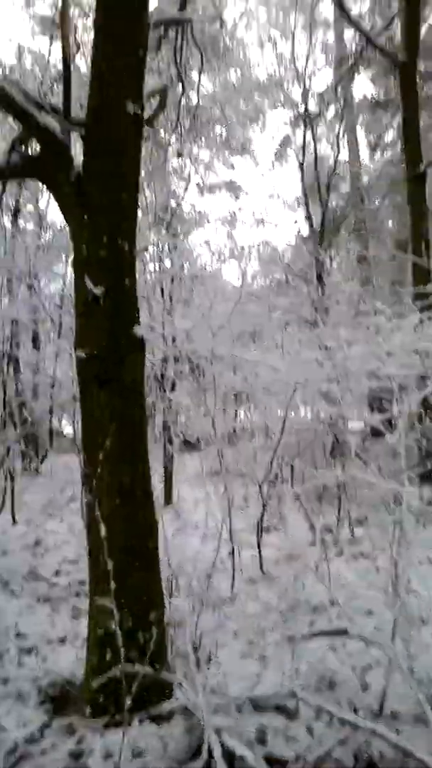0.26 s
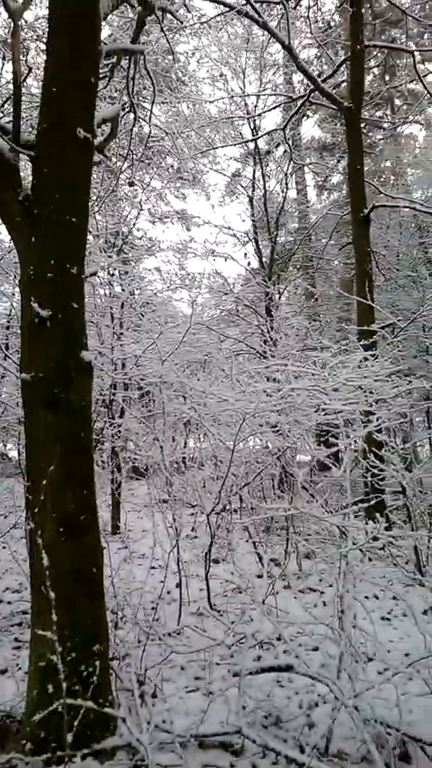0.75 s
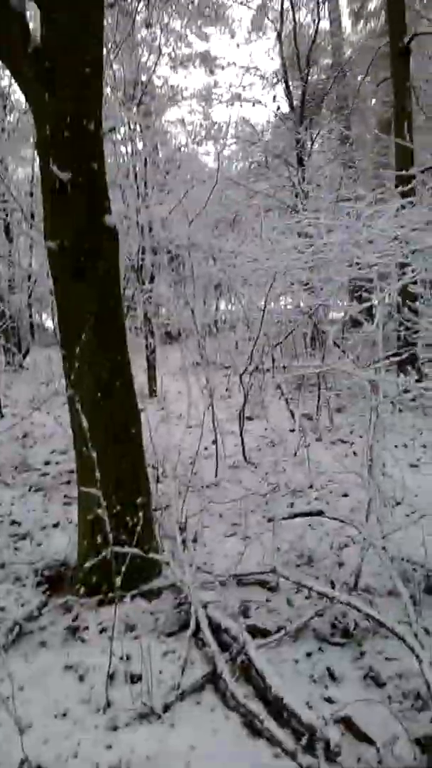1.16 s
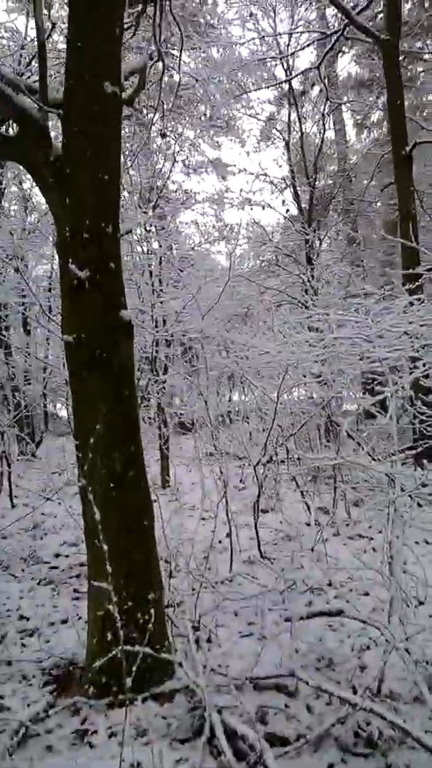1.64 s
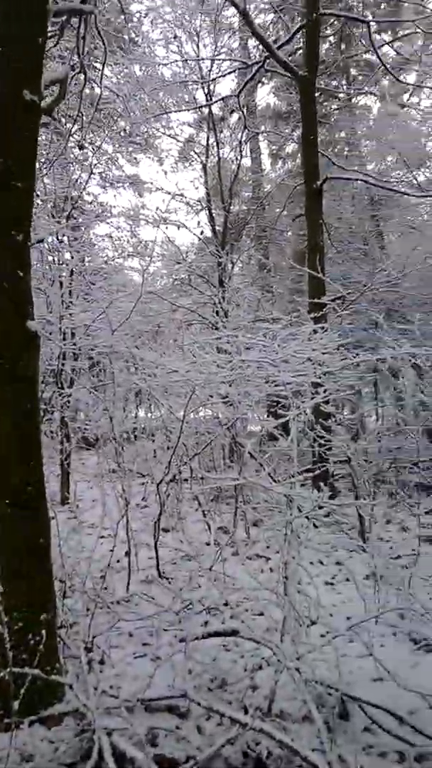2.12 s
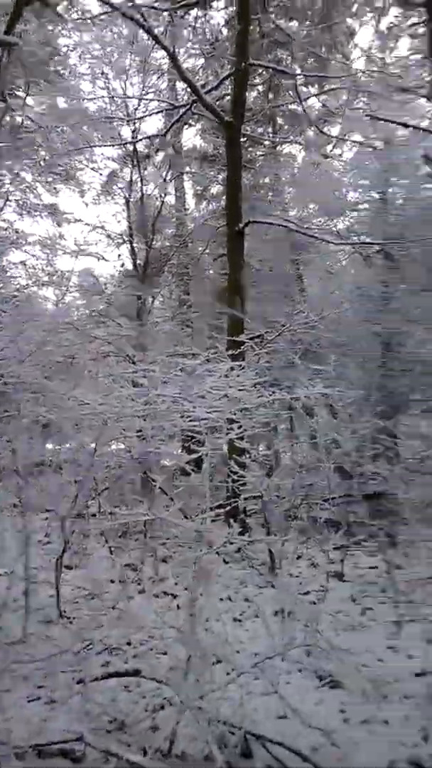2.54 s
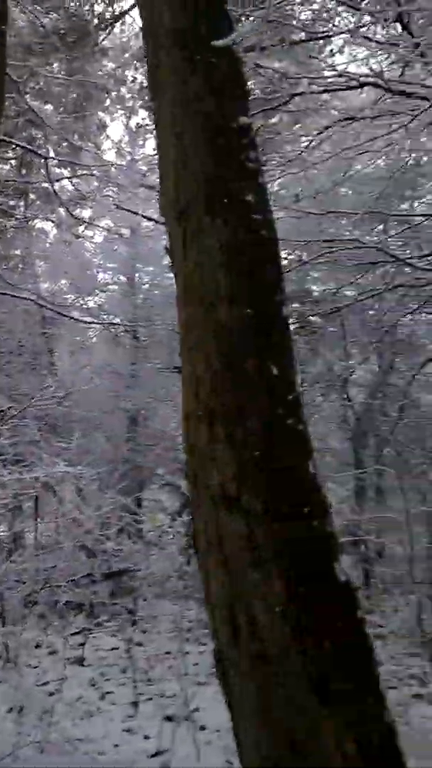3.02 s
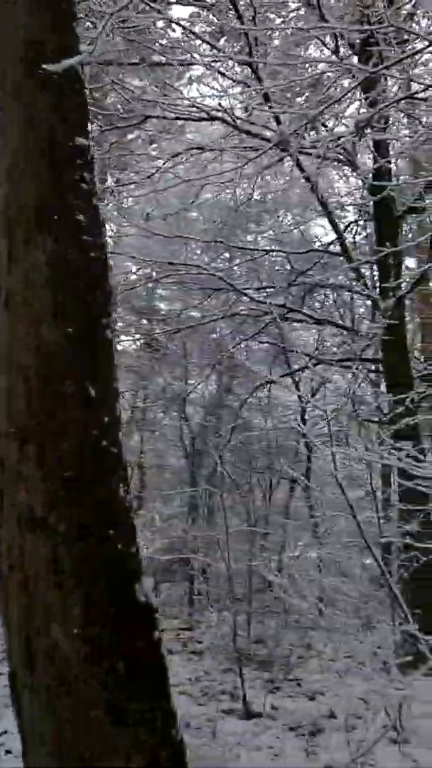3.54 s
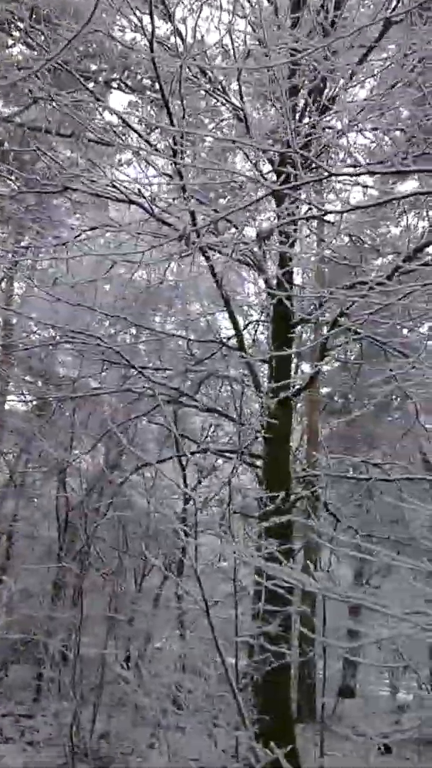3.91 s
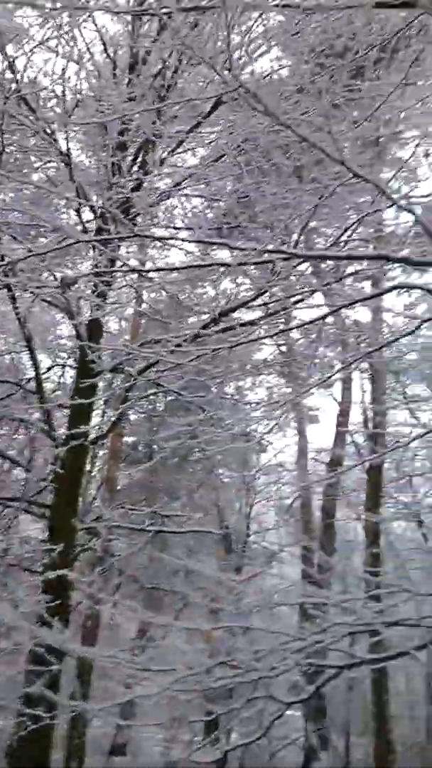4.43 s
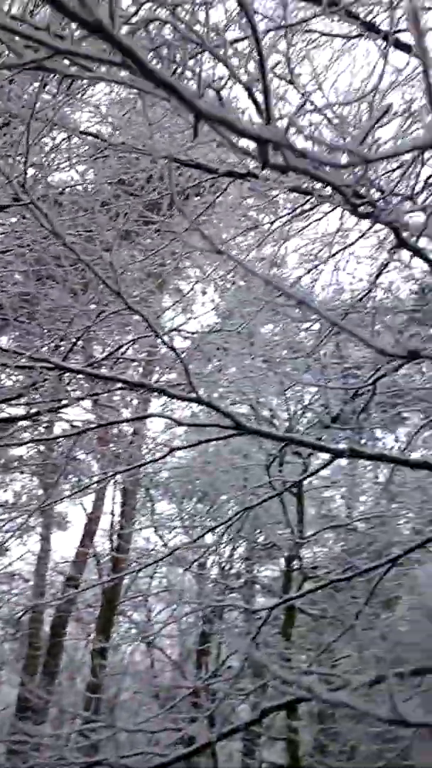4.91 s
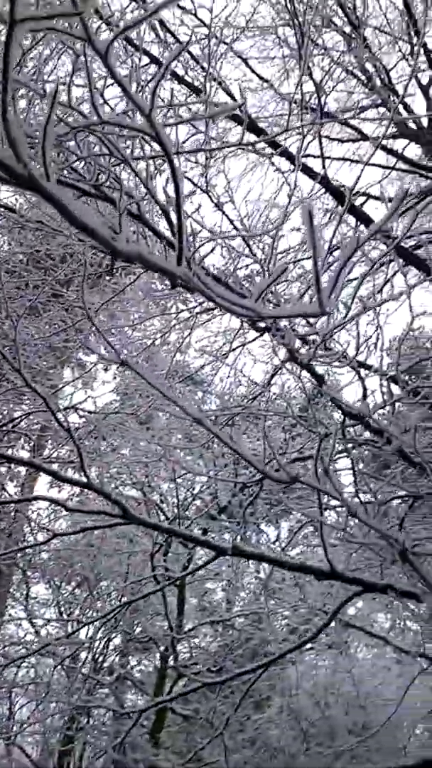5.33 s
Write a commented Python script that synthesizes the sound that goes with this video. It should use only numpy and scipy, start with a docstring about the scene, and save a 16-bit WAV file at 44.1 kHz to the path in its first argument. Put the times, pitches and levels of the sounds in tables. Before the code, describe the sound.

Slow footsteps crunch through crusted snow, sharp icy snaps and gritty squeezes over soft low thumps, in an almost silent forest.

```python
"""First a faint forest hush fades in, and almost at once the crust of the snow begins to snap.
Someone walks through snow in a still forest, heard from a small hand-held microphone.
Snaps are short noise bursts; packed snow crunches and hisses as gritty, filtered noise;
thumps and creaks are low swings that die quickly. Lumpy rustles and the hush are shaped noise."""
import sys
import numpy as np
from scipy.fft import rfft, irfft, next_fast_len
from scipy.io import wavfile
from scipy.ndimage import map_coordinates

SR = 44100
rng = np.random.default_rng(int(sys.argv[2]) if len(sys.argv) > 2 else 0)


def int16_out(signal):
    """Quantize to a 16-bit WAV file."""
    q = np.round(np.clip(np.atleast_2d(signal).T, -1, 1) * 32767)
    wavfile.write(sys.argv[1], SR, q.astype(np.int16))


N = 245637  # length in samples


# Loud snaps of the crust: t/s, level/dB (peak before MIC_EDGE), f/Hz (centre),
# level/dB of the woody knock relative to the snap
CRUST_SNAPS = [(0.0672, -31, 5100, -21), (0.217, -13.5, 4350, -19), (0.2436, -13.5, 4140, -46),
               (0.282, -25.5, 2050, -22.5), (0.373, -23, 4930, -21), (0.393, -23.5, 4500, -31),
               (0.425, -27, 4280, -37), (0.4582, -20, 4630, -35), (0.593, -21.5, 2780, -27),
               (0.6051, -13.5, 4650, -18.5), (0.615, -7.5, 6050, -10), (0.721, -28.5, 5760, -24),
               (0.7711, -20, 4550, -43), (0.7908, -23.5, 3670, -12.5), (0.825, -36, 6450, -38),
               (0.8447, -27, 3830, -35), (0.855, -13, 7540, -31), (0.8584, -13.5, 3700, -26),
               (0.8651, -21, 2840, -5), (0.912, -31, 5500, -30), (0.941, -16.5, 4100, -30),
               (0.961, -2.5, 4560, -20), (0.969, -13.5, 3370, -26), (0.9867, -15, 3040, -34),
               (1.1487, -25, 4460, -12), (1.1718, -22, 5100, -11.5), (1.2745, -35, 4400, -15),
               (1.403, -28.5, 3760, -12), (1.4312, -26.5, 3200, -14), (1.443, -16.5, 4400, -38),
               (1.4599, -10, 3670, -11.5), (1.4626, -25, 3510, -3), (1.4888, -25.5, 3680, -15),
               (1.5059, -3, 4800, -36), (1.5178, -4, 4430, -7), (1.558, -27.5, 5500, -12),
               (1.5905, -9, 3880, -11), (1.602, -1, 4300, -17), (1.6404, -1.5, 4200, -34),
               (1.6427, -5, 3700, -16), (1.6593, -23, 6230, -35), (1.8007, -22.5, 4260, -14.5),
               (1.8632, -16, 4970, -37), (1.8772, -22, 5000, -35), (1.902, -11.5, 3960, -16),
               (1.9455, -15.5, 6650, -22), (1.971, -16, 6330, -14), (2.0026, -15.5, 4080, -40),
               (2.0103, -11, 6700, -24), (2.067, -22, 3670, -35), (2.0853, -16, 5730, -25),
               (2.0904, -4.5, 5870, -50), (2.121, -11.5, 2520, -12.5), (2.137, -16, 5000, -22.5),
               (2.204, -26.5, 6940, -30), (2.2418, -14, 5370, -17), (2.328, -17, 4270, -34),
               (2.3412, -3.5, 2680, -28), (2.353, -9, 2580, -1.5), (2.3923, -18, 1900, -20),
               (2.4728, -21.5, 4100, -35), (2.5437, -22.5, 3300, -34), (2.5839, -21, 5200, -42),
               (2.6547, -25, 3350, -9), (2.659, -18.5, 3900, -36), (2.6847, -22, 3100, -23),
               (2.768, -22.5, 2950, -17), (2.7813, -20, 2590, -6), (2.7863, -18, 6640, -25),
               (2.7936, -15.5, 2560, -4.5), (2.8101, -10, 2500, 3.5), (2.811, -2, 3600, -47),
               (2.8148, -3, 4960, -33), (2.835, -1.5, 3060, -51), (2.859, -5, 6900, -24),
               (2.903, -18, 6650, -12), (2.9367, -33, 7000, -25), (3.041, -25.5, 5760, -13),
               (3.1006, -28.5, 3070, -2.5), (3.1073, -23.5, 5500, -23), (3.1127, -18.5, 4400, -22),
               (3.2064, -8.5, 4400, -26), (3.253, -27.5, 5400, -31), (3.2705, -23, 7110, -26),
               (3.3649, -18.5, 3400, -18), (3.5488, -13.5, 4090, -26), (3.5584, 0, 3330, -23),
               (3.5607, 2.5, 4630, -5.5), (3.6337, -30.5, 2920, -12), (3.681, -11.5, 3500, -6.5),
               (3.773, -20, 6000, -9), (3.7909, -5.5, 3300, -16), (3.8065, -11.5, 2830, -9),
               (3.821, -16.5, 3500, -28), (3.837, -11.5, 2840, -11), (3.8533, -7, 3400, -26),
               (3.91, -6.5, 3230, -48), (3.9124, -6, 3500, -49), (3.9261, -14, 3080, -19),
               (4.007, -23.5, 3930, -36), (4.0753, -26, 8550, -40), (4.1023, -13, 2250, -43),
               (4.1272, -5.5, 2190, -9), (4.136, -10, 4660, -21), (4.1425, -24, 9000, -40),
               (4.2944, -8, 4740, -30), (4.3096, -18, 3540, -23), (4.3223, -15, 5400, -46),
               (4.367, -9.5, 2830, -11.5), (4.4638, -19, 5570, -14), (4.466, -8, 3960, -32),
               (4.86, -16.5, 6180, -40), (4.8725, 2, 8100, -61), (4.8982, -24, 2800, -17),
               (4.9223, -9, 4600, -10), (4.9343, -25, 3500, -22), (4.9856, -12, 4960, -20),
               (5.063, -32, 6000, -19), (5.09, -20, 4060, -43), (5.1321, -25, 4260, -6),
               (5.2675, -9.5, 4600, -27), (5.378, -29, 5090, -34), (5.416, -9.5, 4750, -32)]


def snaps():
    """The loud breaks of the crust also knock the pack below."""
    s, db, hz, knock_db = np.transpose(CRUST_SNAPS)
    t = np.arange(300) / SR
    knock_hz = 850 * np.exp(0.46 * rng.standard_normal((len(s), 1)))
    knock = -np.sin(2 * np.pi * knock_hz * t) * np.exp(-t / 0.00027)
    knocks = placed(s, amp(db + knock_db)[:, None] * peaked(knock))
    return cracks(s, db, hz, width=0.61) + knocks


# The microphone's answer to a sharp break: f/Hz, level/dB
MIC_EDGE = [(500, 10), (4000, -4.5), (9000, -5), (12000, -14.5), (16500, -24), (19000, -57)]


def cracks(s, db, hz, width, order=1):
    """Each crack is a burst coloured around its own pitch, with faint spiky noise before and after."""
    t = (np.arange(1024) - 300) / SR  # the break itself is at t = 0
    after, before = np.clip(t, 0, 1), np.clip(-t, 0, 1)
    noise = rng.standard_normal((len(s), 2 * len(t)))
    spiky = noise[:, len(t):] ** 3
    burst = (t >= 0) * noise[:, :len(t)] * np.exp(-after / 0.0004)
    edge = burst - 2.2 * (t == 0)  # one sharp downward click starts the burst
    crumbs = amp(-38) * (t > 0) * spiky * np.exp(-after / 0.0038)
    lead_in = amp(-29) * (t < 0) * spiky * np.exp(-before / 0.0011)
    colour = hump(np.fft.rfftfreq(len(t), 1 / SR), hz[:, None], width=width) ** order
    crack = irfft(rfft(edge + crumbs + lead_in) * colour)
    return coloured(placed(s + t[0], amp(db)[:, None] * peaked(crack)), MIC_EDGE)


CLUMPING = 0.21  # how much the small breaks crowd into the squeezes
# smallest break over the boot's pressing level, and largest over smallest
CRACKLE_DB, CRACKLE_SPREAD_DB = 4, 13


def crackle():
    """Small random breaks between the loud ones, denser and stronger where the boot presses harder."""
    when, size, pitch = rng.random((1100, 3)).T
    crunch_db, fizz_db = pressure()[:2]
    press_db = np.maximum(crunch_db - 3.5, fizz_db)
    passed = np.cumsum(amp(CLUMPING * press_db))
    at = np.interp(when, passed / passed[-1], np.arange(N))  # in samples
    db = np.interp(at, np.arange(N), press_db) + CRACKLE_DB + CRACKLE_SPREAD_DB * size ** 3
    return cracks(at / SR, db, 1800 * 5.5 ** pitch, width=0.4, order=2)


# Stretches where brittle crust sheds many small bright grains: start t/s, end t/s,
# level/dB (smallest grain, before MIC_EDGE), f/Hz (middle pitch)
GRAIN_SHEDS = [(.24, .47, -52, 4500), (1.84, 2.11, -43, 5000), (2.27, 2.4, -45, 4000),
               (2.53, 2.76, -52, 4500), (2.86, 3.06, -43, 7000), (3.06, 3.3, -51, 6500),
               (3.78, 3.97, -41, 3800), (5.1, 5.2, -54, 4500)]
SHED_RATE, SHED_SPREAD_DB = 170, 17  # grains a second, largest over smallest


def shedding():
    """Brittle grains in uneven clumps, each a short tick near the pitch of its stretch."""
    out = np.zeros(N)
    for start, end, db, hz in GRAIN_SHEDS:
        gap, size, pitch = rng.random((round(SHED_RATE * (end - start)), 3)).T
        s = start + (end - start) * np.cumsum(gap ** 2) / np.sum(gap ** 2)
        grain_db = db + SHED_SPREAD_DB * size ** 2
        out += cracks(s, grain_db, hz * 2 ** (pitch - 0.5), width=0.55, order=2)
    return out


# Tone of the fine crystals: f/Hz, level/dB (only the shape counts)
CRYSTAL_TONE = [(1000, 10), (3500, 5.5), (6000, 8.5), (8500, 3), (11500, -5), (19000, -38)]
# Tone of the crumbling pack: f/Hz, level/dB (only the shape counts)
PACK_TONE = [(25, -4), (70, 8), (200, 0), (500, -9.5), (1000, -13.5), (2000, -50)]


def snow():
    """Grains break under the boot: a crunch of moving pitch, a fine fizz and a crumbling body."""
    crunch_db, fizz_db, body_db, hz = pressure()
    centres = np.geomspace(1000, 6200, 7)
    place = np.interp(np.log(hz), np.log(centres), np.arange(len(centres)))
    crunch = np.zeros(N)
    for k, centre in enumerate(centres):  # a moving resonance: neighbouring fixed ones cross-fade
        grains = gritty(300, share=0.8)
        band = unit(filtered(grains, lambda f: hump(f, centre, width=0.46) ** 2))
        crunch += np.sqrt(np.clip(1 - abs(place - k), 0, 1)) * band
    fizz = unit(coloured(gritty(500, share=0.8), CRYSTAL_TONE))
    body = unit(coloured(gritty(270, share=0.64), PACK_TONE))
    uneven_db = 3 * np.array([wobble(90), wobble(90)])  # the boot sinks in jerks
    crunch = amp(crunch_db + uneven_db[0]) * crunch
    fizz = amp(fizz_db + uneven_db[1]) * fizz
    return crunch + fizz + amp(body_db) * body


# Squeezes of the boot: start t/s, length t/s, crunch level/dB at the start, its change level/dB,
# first and last crunch centre f/Hz, fizz and body level/dB relative to the crunch at the start
BOOT_SQUEEZES = [(.22, .24, -58.5, -6, 5000, 5070, -7, 9), (.855, .08, -55, 2.5, 3020, 3930, -5.5, 5.5),
                 (.961, 0.11, -44, -12.5, 3520, 2120, 3.5, 0.5),
                 (1.15, .03, -58, -1, 2170, 2350, -21.5, 6.5),
                 (1.441, .085, -63, 13.5, 1870, 2520, -38, 13), (1.6, 0.042, -55, 9.5, 1660, 1450, -18, 8),
                 (1.85, 0.034, -59, 1, 3800, 3320, 6, -21), (1.913, .19, -62, 9.5, 2100, 2770, -1, 2),
                 (2.131, 0.14, -71, 2, 1310, 1600, -6, 12.5),
                 (2.307, 0.068, -57.5, 7.5, 2800, 1850, 5, 5.5),
                 (2.788, 0.079, -48.5, -5, 1510, 2150, 3.5, 11), (2.858, .16, -60, 0, 1100, 2880, 1, 18),
                 (3.542, .1, -51, -10.5, 3200, 2520, 4, 8), (3.685, 0.035, -58.5, 2, 6000, 5500, -8, 12.5),
                 (3.776, .11, -48, -6.5, 1920, 2160, 0.5, 13), (3.908, 0.064, -53, -2.5, 2300, 2130, -1, 2),
                 (4.002, .08, -57, -4.5, 2020, 1980, 2, -3), (4.128, 0.065, -47.5, -2, 1410, 2250, -2.5, 3),
                 (4.213, 0.061, -51.5, 5.5, 3220, 3370, -11, -2.5),
                 (4.299, .1, -51, 2, 3320, 3120, -9, 2.5), (4.449, .38, -66.5, -2.5, 3500, 3000, -10.5, 8),
                 (4.913, .26, -63.5, -15.5, 2400, 2200, 10.5, 9.5)]
ATTACK_DB_PER_S, RELEASE_DB_PER_S = 1198, 601.5  # how fast a squeeze comes and goes
FIZZ_GAINS_DB_PER_S, BODY_GAINS_DB_PER_S = 11, -28  # against the crunch, while the boot sinks
# loose grains between squeezes: crunch, fizz and body levels, and the crunch centre
TRICKLE_DB, TRICKLE_HZ = (-74.5, -71, -102), 2300


def pressure():
    """All squeezes together: levels of crunch, fizz and body in dB, and the crunch centre in Hz."""
    start, length, db, change_db, first_hz, last_hz, fizz_db, body_db = (
        np.transpose(BOOT_SQUEEZES)[..., None])
    clock = np.arange(0, N / SR, 0.002)
    t = clock - start
    held = np.clip(t, 0, length)
    attack_db = ATTACK_DB_PER_S * np.clip(-t, 0, 9)
    release_db = RELEASE_DB_PER_S * np.clip(t - length, 0, 9)
    crunch_db = db + change_db * held / length - attack_db - release_db
    fizz_db = crunch_db + fizz_db + FIZZ_GAINS_DB_PER_S * held
    body_db = crunch_db + body_db + BODY_GAINS_DB_PER_S * held
    layers = amp(2 * np.array([crunch_db, fizz_db, body_db]))  # doubled dB gives power
    quiet = amp(2 * np.array(TRICKLE_DB))[:, None]
    power = layers.sum(axis=1) + quiet
    glide_hz = first_hz * (last_hz / first_hz) ** (held / length)
    # the stronger a squeeze, the more it decides the shared centre
    hz = ((layers[0] * glide_hz).sum(axis=0) + quiet[0] * TRICKLE_HZ) / power[0]
    curves = (*(10 * np.log10(power)), hz)
    return [np.interp(np.arange(N) / SR, clock, c) for c in curves]


# Thumps as the snow gives way: t/s, level/dB (peak), f/Hz (the swing settles at 0.8 of this)
SNOW_THUMPS = [(.242, -36.5, 179), (0.384, -34, 67), (0.399, -38.5, 64), (.614, -28, 257),
               (0.859, -40.5, 232), (0.867, -26, 155), (0.962, -26.5, 90), (0.978, -28.5, 83.6),
               (1.171, -39.5, 117), (1.341, -43, 97), (1.46, -18, 97), (1.489, -20, 185), (1.52, -19, 115),
               (1.592, -24, 206), (1.602, -14.5, 95), (1.644, -14.5, 94), (1.902, -27, 156),
               (2.352, -14, 98.4), (2.365, -20.5, 203), (2.391, -32, 242), (2.808, -26, 114),
               (3.077, -39, 113), (3.103, -38, 116), (3.199, -30.5, 117), (3.365, -37.5, 101),
               (3.549, -29.5, 167), (3.561, -20.5, 75), (3.586, -29.5, 206), (3.681, -23.5, 93),
               (3.776, -22.5, 175), (3.791, -19, 188), (3.806, -21, 108), (3.819, -24.5, 230),
               (3.838, -30, 74), (3.85, -27.5, 84.6), (3.927, -37, 67), (4.126, -44, 240),
               (4.366, -22.5, 86), (4.389, -30.5, 86), (4.466, -35, 225), (4.871, -31, 240),
               (4.921, -33, 246), (4.985, -34, 227), (5.062, -37, 207), (5.09, -38, 230),
               (5.267, -34.5, 240), (5.415, -33, 213)]


def thumps():
    """The snow pack gives way with a soft low push."""
    s, db, hz = np.transpose(SNOW_THUMPS)[..., None]
    return placed(s[:, 0], amp(db) * peaked(push(hz, life=3.56)))


def push(hz, life):
    """A quick dip, then a swing that sags to 0.8 of hz and loses 60 dB in life / hz seconds."""
    t = np.arange(SR // 8) / SR
    dip = 0.37 * (1 - np.exp(-t / 0.00073))
    cycles = dip + hz * (0.8 * t + 0.0024 * (1 - np.exp(-t / 0.0037)))
    return -np.sin(2 * np.pi * cycles) * amp(-60 * t * hz / life) * (1 - np.exp(-t / 0.005))


# Stick-slip creaks of squeezed snow: start t/s, end t/s, first and last slips a second,
# level/dB (middle value), f/Hz (the swing settles at 0.8 of this),
# dull and bright tick level/dB relative to the level
SNOW_CREAKS = [(2.155, 2.243, 67, 56.6, -33.5, 147, 4.5, -3), (2.246, 2.303, 74.5, 63, -35, 148, 5, -7),
               (2.869, 2.912, 243, 163, -25, 151, -7.5, -27),
               (2.914, 2.94, 184.5, 196, -26.5, 141, -3.5, -28),
               (2.948, 3.02, 60.3, 73.5, -19, 114, -1, -5), (5.443, 5.548, 38, 34.2, -25, 250, -30, -16)]
SLIP_HZ = 7050  # middle pitch of a slip's bright tick


def creaks():
    """Slips at a gliding rate, each a small push with a dull tick and a bright one."""
    out, t = np.zeros(N), np.arange(SR // 8) / SR
    for start, end, first, last, db, hz, dull_db, tick_db in SNOW_CREAKS:
        clock = np.arange(start, end, 1 / SR)
        passed = np.cumsum(np.linspace(first, last, len(clock))) / SR  # slips so far
        s = clock[np.searchsorted(passed, np.arange(passed[-1]))]
        late, louder, brighter, higher = rng.standard_normal((4, len(s)))  # no two slips alike
        dull = -np.sin(2 * np.pi * 1100 * t) * np.exp(-t / 0.00028)
        slip = push(hz, life=4.5) + amp(dull_db) * dull
        out += placed(s + 0.0003 * late, amp(db + 1.4 * louder)[:, None] * slip)
        bright_db, bright_hz = db + tick_db + 3 * brighter, SLIP_HZ * np.exp(0.13 * higher)
        out += cracks(s, bright_db, bright_hz, width=0.48, order=2)
    return out


# Lumpy low-mid rustles, mostly during the squeezes: start t/s, length t/s,
# level/dB (middle value), f/Hz (centre)
LUMPY_RUSTLES = [(0.255, 0.134, -64.5, 710), (0.87, 0.072, -59, 500), (2.36, 0.07, -44, 330),
                 (3.8, 0.08, -39.5, 453), (4.125, 0.074, -52, 800)]


def lumps():
    """A lumpy low-mid rustle that swells and stops: noise around one pitch, its level wobbling."""
    out, t = np.zeros(N), np.arange(N) / SR
    for start, length, db, hz in LUMPY_RUSTLES:
        noise = rng.standard_normal(N)
        rustle = unit(filtered(noise, lambda f: hump(f, hz, width=0.48) ** 2))
        inside = np.minimum(t - start, start + length - t)  # seconds to the nearer end
        swell = np.clip(inside / 0.018 + 0.5, 0, 1)
        out += amp(db + 2.4 * wobble(120)) * swell * rustle
    return out


# Tone of the still forest: f/Hz, level/dB (only the shape counts)
FOREST_TONE = [(25, 5.5), (87, 7.5), (240, -7), (1400, -16.5), (2500, -27.5), (6000, -18.5), (7200, -29),
               (8200, -39), (16800, -29), (17600, -48)]


def hush():
    """The faint air of the forest, fading in over the first moment and drifting a little."""
    rise_db = np.interp(np.arange(N) / SR, [0.02, 0.11], [-30, 0])
    air = unit(coloured(rng.standard_normal(N), FOREST_TONE))
    return amp(-58.5 + rise_db + 0.68 * wobble(2.886)) * air


def amp(db):
    """Decibels turned into a plain multiplier."""
    return 10 ** (np.asarray(db) / 20)


def unit(x):
    """x brought to an average (RMS) strength of 1."""
    return x / np.sqrt(np.mean(x ** 2) + 1e-20)


def peaked(rows):
    """Each row brought to a peak of 1."""
    return rows / np.abs(rows).max(axis=1, keepdims=True)


def along(points, hz):
    """Read a curve of (Hz, value) points on a log axis."""
    f, v = np.transpose(points)
    return np.interp(np.log(hz + 1), np.log(f + 1), v)


def wobble(rate):
    """A smooth random curve, rate knots a second."""
    knots = rng.standard_normal(int(N * rate / SR) + 4)
    return map_coordinates(knots, [np.arange(N) * rate / SR])


def hump(hz, centre_hz, width):
    """A broad resonance, its width in natural-log units of frequency."""
    return 1 / (1 + (np.log((hz + 1) / centre_hz) / width) ** 2)


def filtered(x, response):
    """x times a response of frequency."""
    m = next_fast_len(N + SR // 2)
    return irfft(rfft(x, m) * response(np.fft.rfftfreq(m, 1 / SR)), m)[:N]


def coloured(x, spectrum):
    """x in the colour of a spectrum."""
    return filtered(x, lambda hz: amp(along(spectrum, hz)))


def placed(seconds, rows):
    """Each row of samples added at its time."""
    first = np.round(np.asarray(seconds) * SR).astype(int)
    at = first[:, None] + np.arange(rows.shape[1])
    return np.bincount(np.clip(at, 0, N).ravel(), rows.ravel(), N + 1)[:N]


def gritty(rate, share):
    """Noise mixed with a share of sparse grains of very unequal size, rate grains a second."""
    size = amp(5 * rng.exponential(size=N).clip(0, 3))
    grains = (rng.random(N) < rate / SR) * rng.standard_normal(N) * size
    return unit(share * unit(grains) + rng.standard_normal(N))


def scene():
    """All sounds at the single microphone."""
    crust = snaps() + crackle() + shedding()
    pack = snow() + thumps() + creaks() + lumps()
    return (crust + pack + hush())[None]


TOP_HZ = 19250  # the recorder's band limit


def record(dry):
    """Nothing is kept above the recorder's band limit."""
    return filtered(dry[0], lambda hz: hz < TOP_HZ)[None]


dry = scene()
out = record(dry)
int16_out(out)
```